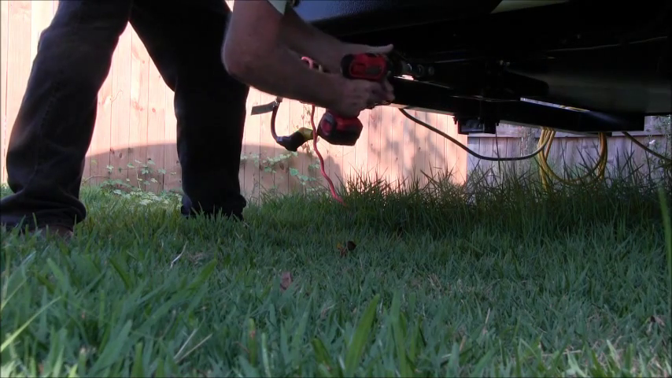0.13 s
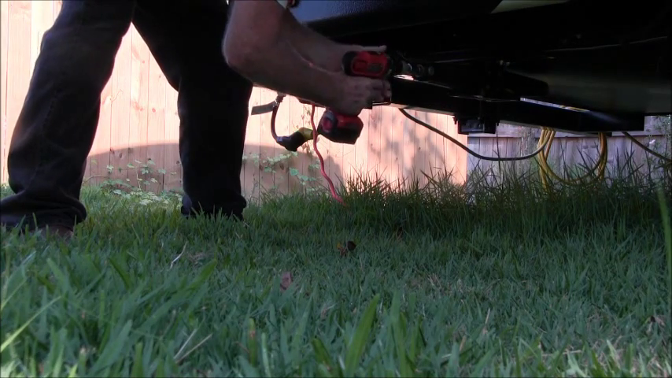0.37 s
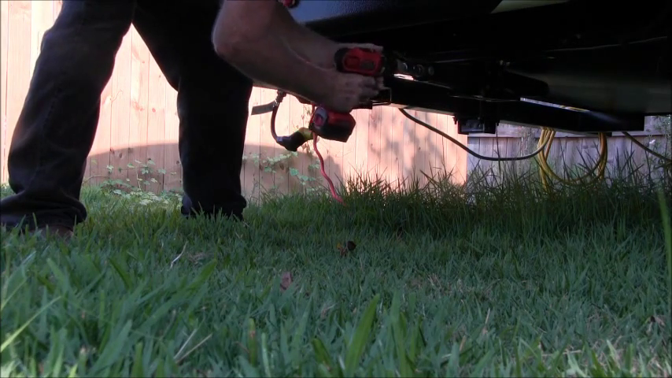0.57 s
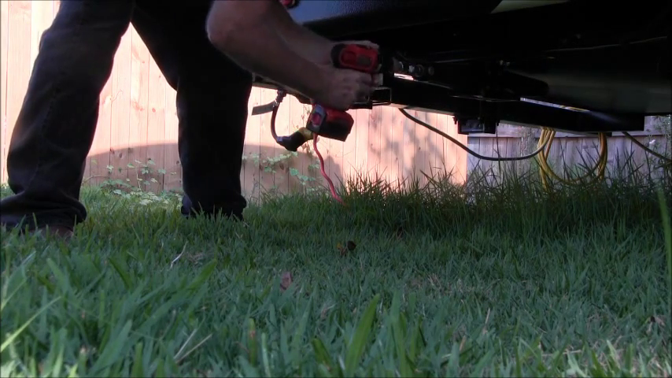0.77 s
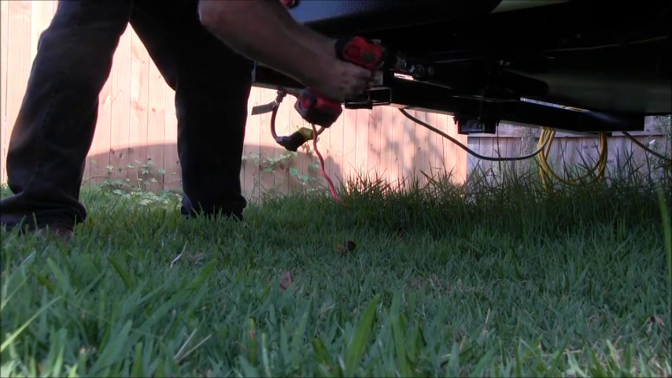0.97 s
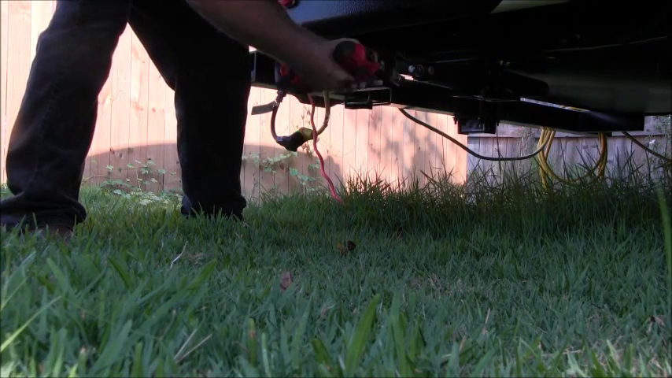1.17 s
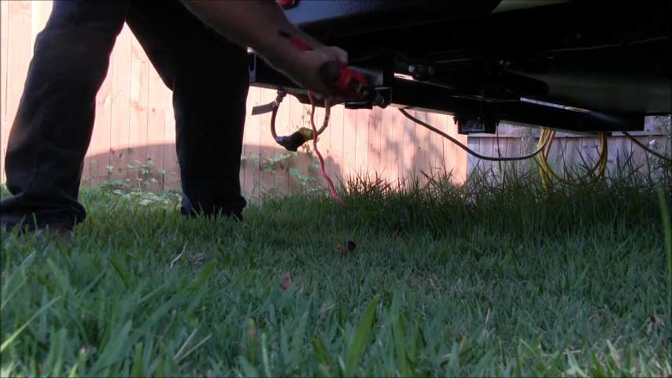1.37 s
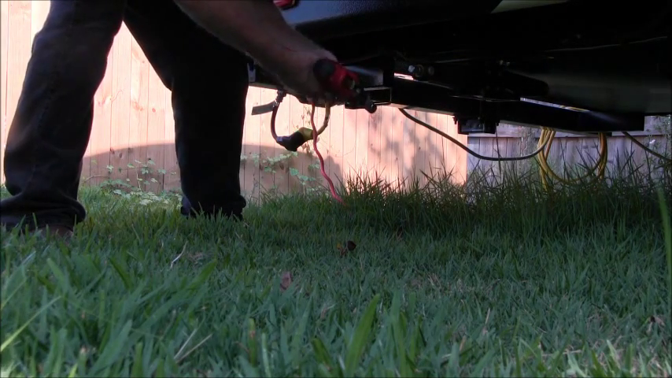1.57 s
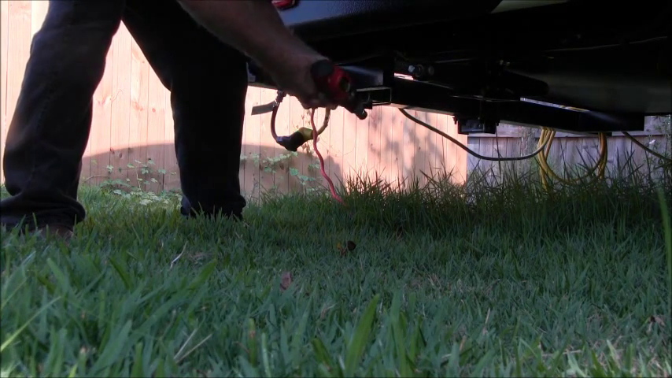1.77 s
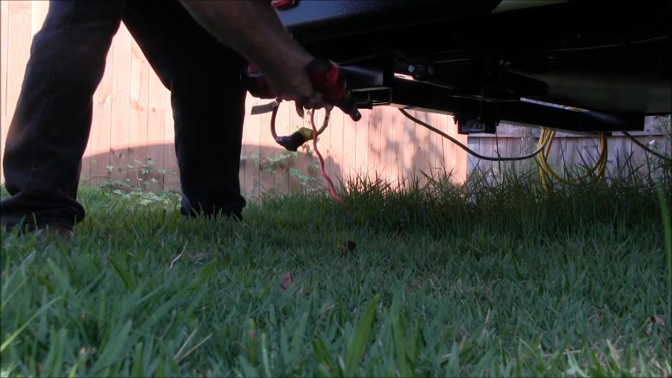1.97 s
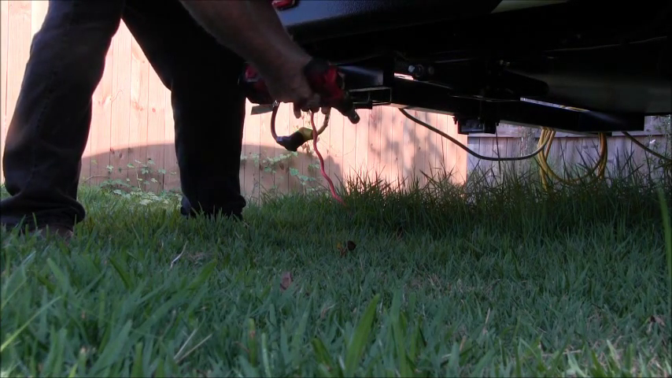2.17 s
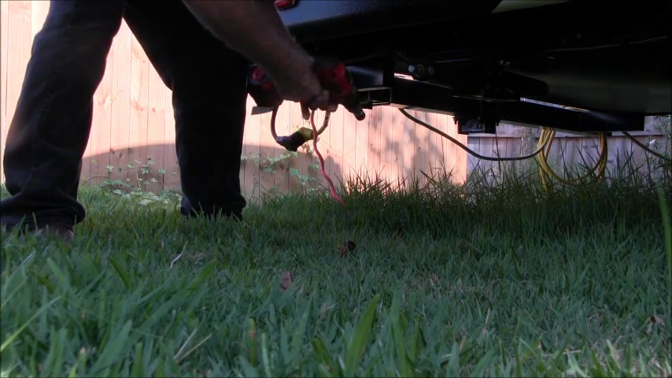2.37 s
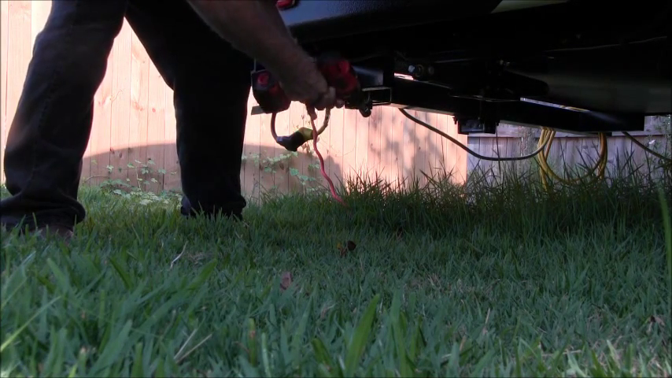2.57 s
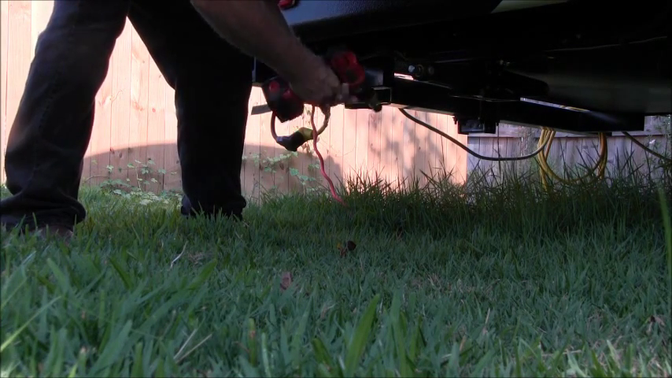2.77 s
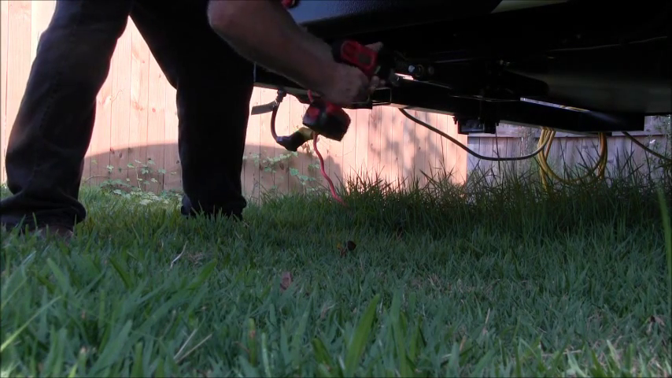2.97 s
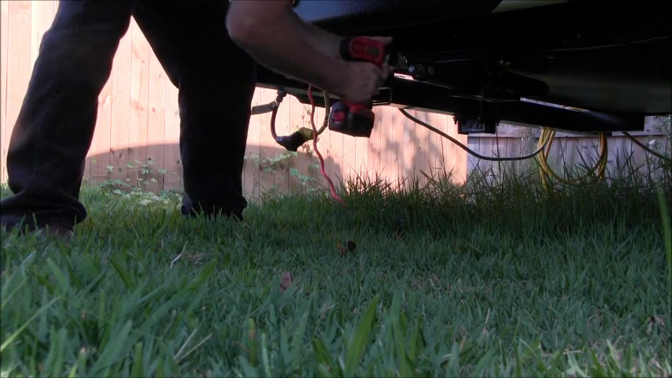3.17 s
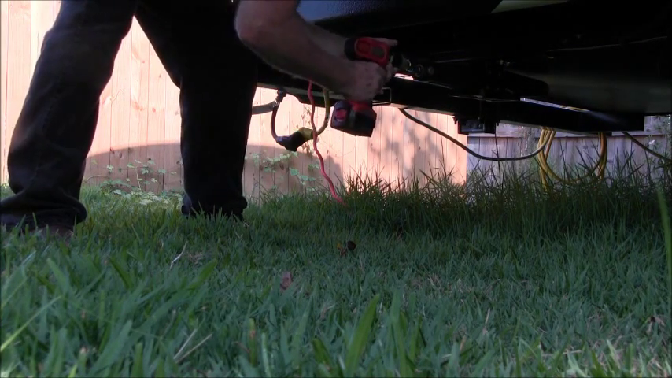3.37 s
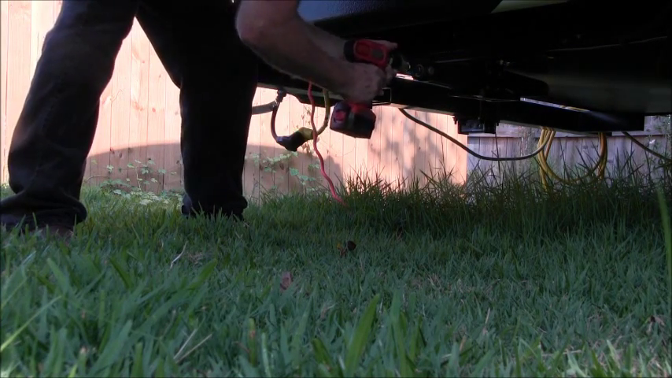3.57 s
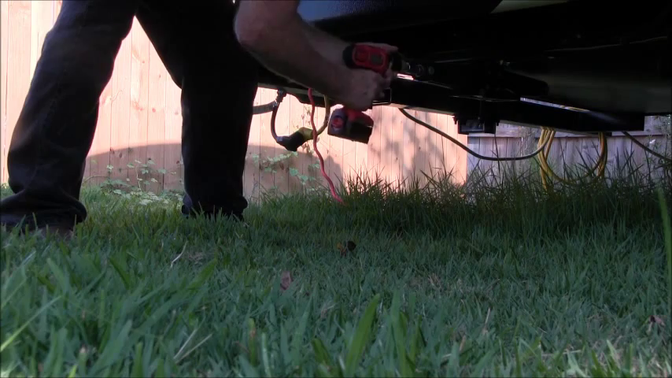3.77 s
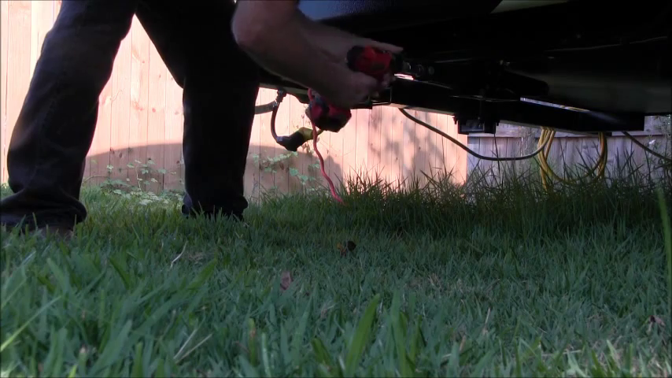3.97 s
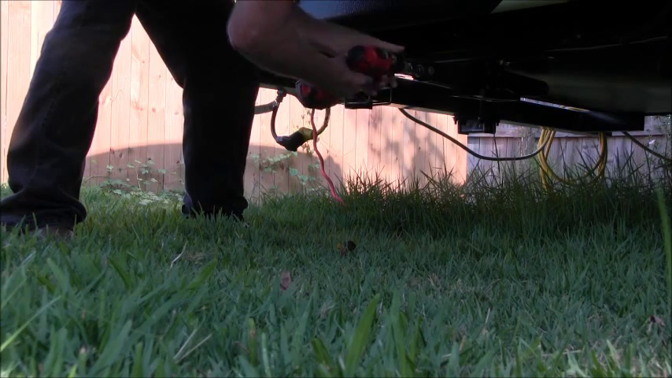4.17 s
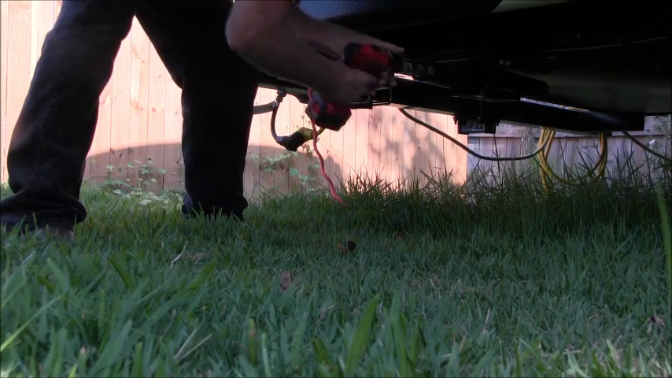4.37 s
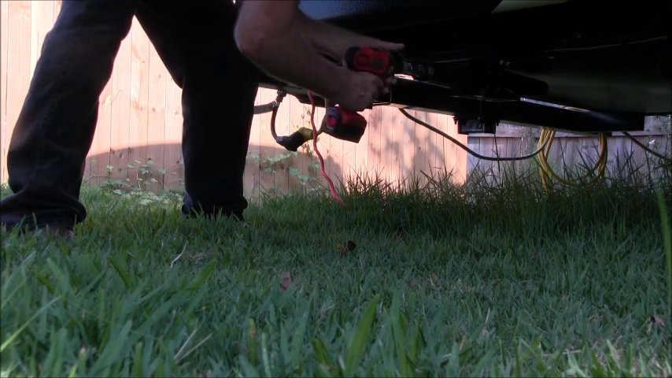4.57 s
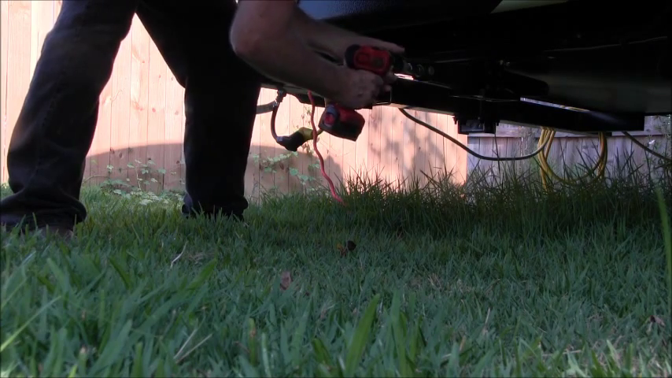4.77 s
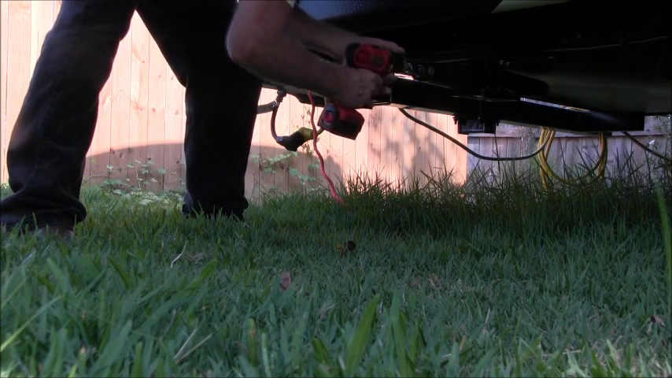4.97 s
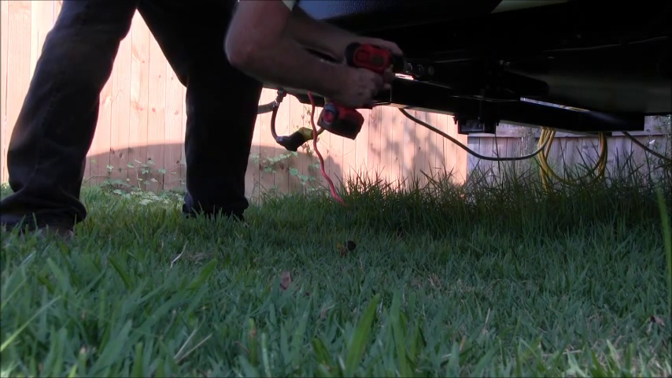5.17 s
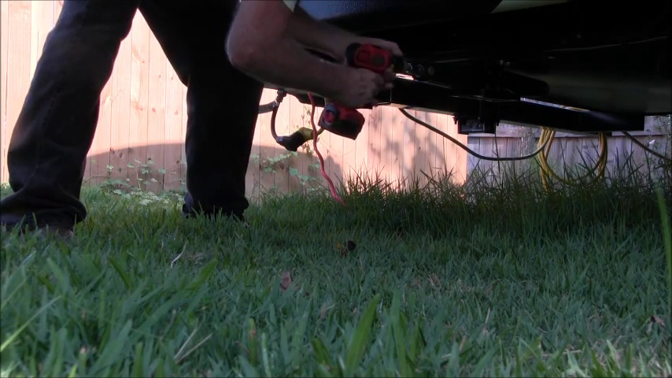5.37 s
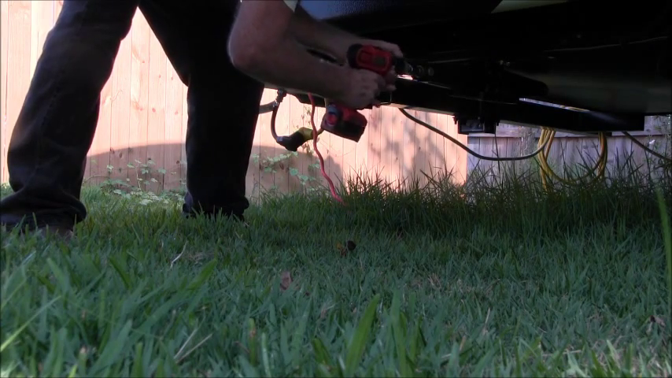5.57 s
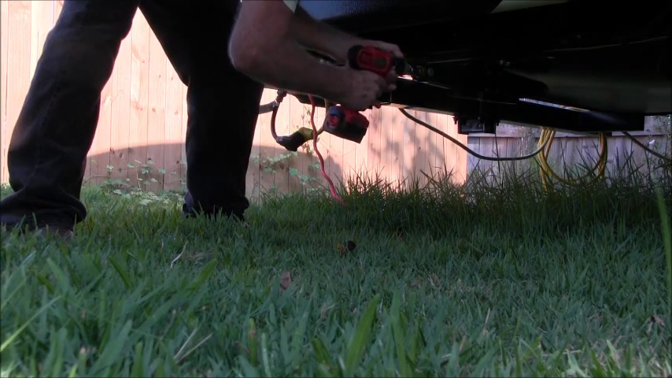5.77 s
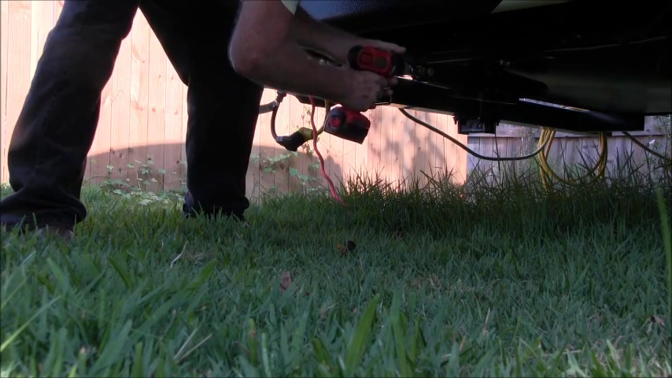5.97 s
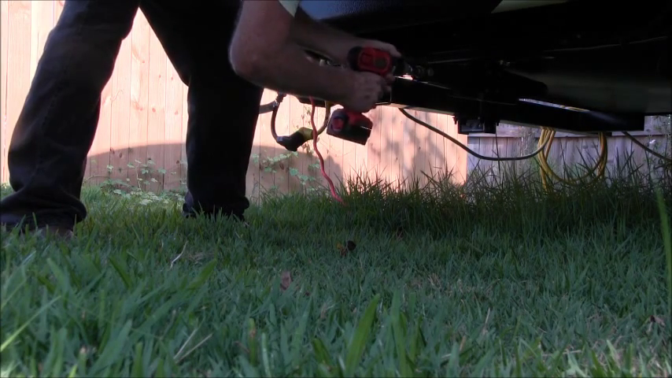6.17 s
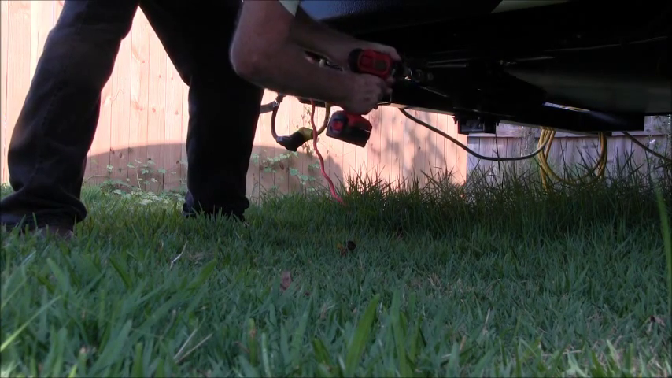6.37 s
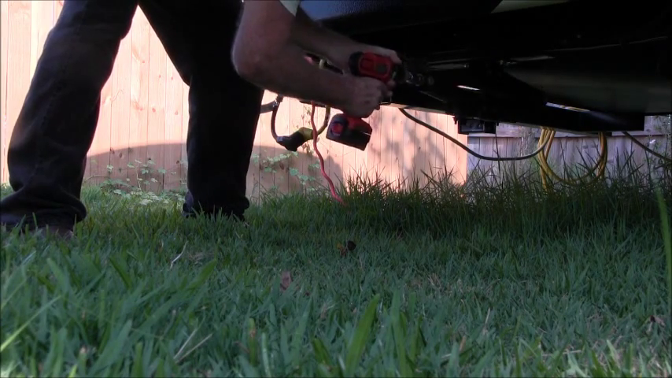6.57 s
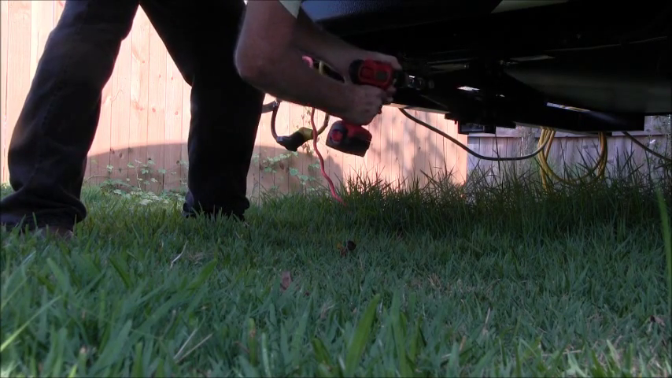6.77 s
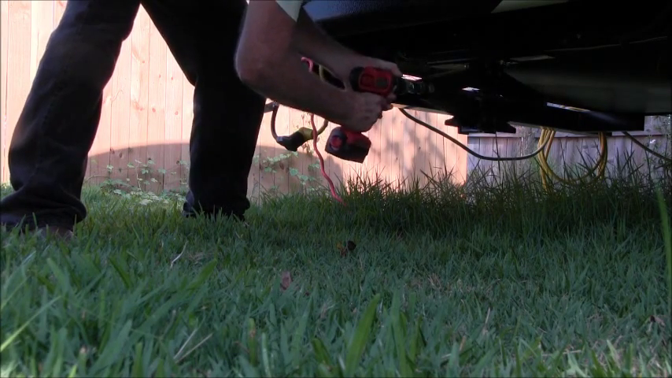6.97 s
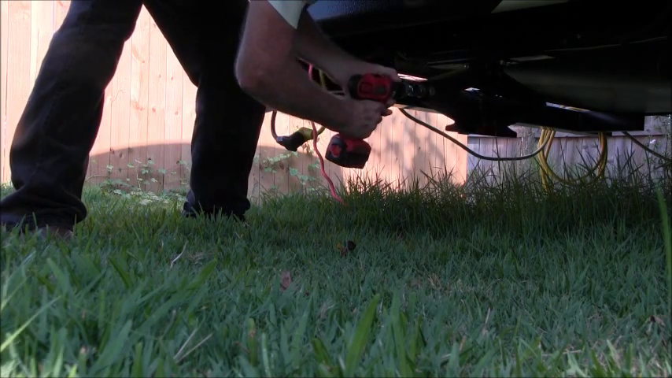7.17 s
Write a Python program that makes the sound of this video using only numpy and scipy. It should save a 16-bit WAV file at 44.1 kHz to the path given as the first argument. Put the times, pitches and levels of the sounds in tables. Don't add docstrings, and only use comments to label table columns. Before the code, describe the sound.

A small microphone in the grass, a few metres from a trailer, hears isolated switch snaps with quick fence echoes, then hard metallic knocks, dull thumps and low dragging groans. Finally a cordless drill gives one short try, then spins up high and holds, gears rattling and socket slapping the screw in quick alternation. Soft traffic, hiss, insect and birds stay behind.

```python
import sys
import numpy as np
from scipy import signal
from scipy.fft import rfft, irfft
from scipy.io import wavfile
from scipy.ndimage import uniform_filter1d

SR = 44100
rng = np.random.default_rng(int(sys.argv[2]) if len(sys.argv) > 2 else 0)


def field_ratio(decibels):
    return 10 ** (np.asarray(decibels, dtype=float) / 20)


def generate_wav(sig):
    pcm = np.round(np.clip(np.atleast_2d(sig).T, -1, 1) * 32767).astype(np.int16)
    wavfile.write(sys.argv[1], SR, pcm)


N = 318397
T = np.arange(N) / SR
LEFT_RIGHT = np.array([[1], [-1]])

# (squeeze [s], release [s], gear rattle [dB], whine [dB])
PULLS = [
    (5.517, 5.705, -35, -35.5),
    (6.269, 7.3, -31, -34.5),
]
# (time [s], frequency [Hz])
MESH_PITCH = [(5.5, 2000), (5.58, 2850), (5.66, 3540), (5.7, 3600), (5.8, 3000), (6.25, 2000), (6.34, 2900),
              (6.4, 3560), (6.45, 3990), (6.56, 4150), (6.8, 4210), (7.22, 4225)]
# (multiple of motor turns, level [dB])
MOTOR_ORDERS = [(12, 0), (10, -16), (15, -11), (24, -20), (40, -27)]
# (frequency [Hz], density [dB])
RATTLE_SPECTRUM = [(400, -8), (750, -9.5), (870, 3), (1100, -6), (1800, 0.5), (2900, 6), (3600, 6.5),
                   (4600, 1), (6000, -1.5), (10000, -6.5), (12500, -12.5), (15500, -7.5), (17000, -48)]
# (first time [s], peak [dB], boom over it [dB], centre [Hz], contact [ms])
TURN_SLAPS = [
    (6.444, -12.5, 0.5, 1850, 2.2),
    (6.53, -18, 1, 2700, 3.6),
]
# (time [s], peak [dB], boom over it [dB], centre [Hz])
JOLTS = [(5.556, -19.5, -9, 2700), (5.584, -19.5, 4.5, 670), (5.606, -16.5, -2, 3200),
         (5.666, -10, -5.5, 2380), (5.7, -18.5, -23, 2030), (5.713, -20, -4, 670), (6.298, -20, -7, 1500),
         (6.342, -10, -6, 2740), (6.521, -33, 2, 2900), (6.789, -22, 4, 1790), (7.015, -17, 0.5, 3000),
         (7.046, -14, -12, 2950)]
# (frequency [Hz], level [dB], t60 [s])
SCREW_MODES = [(680, -6, .15), (815, -8, .12), (865, -6, .15), (935, -4, .1), (1400, -8, .1),
               (1770, -2.5, .08), (2130, -8, .07), (2260, -5, .1), (2810, -5, .09), (2960, -2, .09),
               (3500, -8, .09), (8530, -20, .05), (9950, -20, .04), (14000, -24, .03)]
# (frequency [Hz], level [dB], t60 [s])
JACK_MODES = [(680, -4, .22), (1141, -6, .13), (1420, -7, .13), (1803, -4, .22), (1906, -11, .33),
              (1992, -12, .16), (2046, -10.5, .33), (2234, -6.5, .34), (2433, -3, .09), (2600, -2, .1),
              (2690, -2, .11), (2751, -5, .17), (2900, -5, .14), (3085, -8, .13), (3400, -10, .13)]
# (frequency [Hz], level [dB], t60 [s])
FLOOR_MODES = [(158.8, -2, 0.29), (185, 0, 0.17), (255.5, -4.5, 0.19), (303, -14, 0.134),
               (364.6, -13, 0.22), (667.5, -11.5, 0.36)]
# (time [s], peak [dB], boom over it [dB], top over it [dB], centre [Hz])
DRAGS = [
    (.645, -43.5, 8.5, -5, 700),
    (.663, -38.5, 6, -15, 2600),
    (.685, -32.5, 2, -8, 810),
    (3.586, -15, -14.5, -18, 2870),
    (3.692, -20.5, -12, -21, 2650),
    (3.72, -30, 0, -19, 1440),
    (4.309, -26, -27, -2, 1870),
]
# (time [s], peak [dB], boom over it [dB], top over it [dB], centre [Hz])
TAPS = [
    (3.589, -24, -25, -20, 2260),
    (3.683, -29.5, -22, -10, 2600),
    (4.002, -39.5, 4, -3, 2620),
    (4.147, -37.5, 5, -16, 2600),
    (4.161, -39, 11.5, -18, 1190),
    (4.281, -32.5, 6.5, -11, 2620),
    (4.321, -12.5, -3.5, 1.5, 1600),
    (4.506, -37, -4, -5, 1940),
]
# (time [s], boom [dB])
THUMPS = [
    (3.867, -39),
    (4.23, -31.5),
    (4.38, -32),
    (4.599, -40.5),
]
# (time [s], peak [dB], low edge [Hz], high edge [Hz], fence echo [dB])
CLICKS = [
    (1.465, -39, 1500, 9200, -1.5),
    (1.7555, -28.5, 1520, 3600, -1),
    (2.0653, -7, 1400, 6900, -6.5),
    (2.2154, -26, 1110, 7700, 0.5),
    (2.243, -42.5, 700, 3200, 4),
    (2.9712, -34.5, 1510, 4100, -4),
    (5.34, -51, 3000, 9000, -1),
    (5.412, -39.5, 3560, 9250, -15),
    (5.525, -41, 1990, 5600, -5),
    (6.264, -45, 2000, 8000, -3),
]
# (time [s], level [dB])
HANDLING = [
    (3.0, -73),
    (3.25, -55.5),
    (3.75, -46),
    (4.2, -48.5),
    (4.34, -36),
    (4.45, -46),
    (4.66, -47.5),
    (4.74, -60),
]
# (start [s], end [s], pitch [Hz], roughness [Hz], level [dB])
CREAKS = [
    (0.477, .9, 1400, 900, -60),
    (1.578, 1.76, 1167, 250, -66),
    (4.66, 4.95, 4180, 1500, -71),
    (3.362, 3.613, 1460, 352, -62),
    (3.78, 3.997, 4300, 1800, -61.5),
    (5.92, 6.302, 1670, 150, -66.5),
]
# (start [s], end [s], first pitch [Hz], last pitch [Hz], level [dB])
CHIRPS = [
    (0, 0.06, 4000, 3200, -59.5),
    (0.42, 0.55, 4950, 3950, -63),
    (2.64, 2.722, 6700, 7200, -76),
    (2.8, 2.877, 7100, 7000, -70),
]
# (start [s], end [s], first pitch [Hz], last pitch [Hz], level [dB])
TRILL = [
    (2.03, 2.061, 6800, 7740, -54),
    (2.07, 2.157, 7300, 7940, -55),
    (2.15, 2.228, 7950, 7700, -60.5),
]
# (frequency [Hz], density [dB])
TRAFFIC_SPECTRUM = [(12, -51), (20, -2), (112, 1), (195, -6.5), (243, -11), (328, -16), (422, -22.5),
                    (650, -30.5), (700, -21), (910, -59), (1540, -120)]
# (frequency [Hz], density [dB])
AIR_SPECTRUM = [(290, 7), (500, 2.5), (960, -1.5), (1190, -0.5), (7750, -10.5), (9490, -10), (10400, -14),
                (14200, -16.5), (16000, -25)]
# (time [s], step [dB])
DUCKS = [
    (2.09, -6),
    (4.36, -6),
]

SCREW_TURN_S, FASTEST_S = 0.165, 6.68
SPIN_UP_DB, SPIN_UP_S, COAST_DB_PER_S = 34, 0.036, 420
WHINE_DB_PER_KHZ, SINGS_FROM_HZ = -2, 2970
UNLOAD_DB = 9
FAN_DB, RUMBLE_DB, RUMBLE_COAST_SHARE = 0.27, -0.5, 0.39
SHAKE_DB, SHAKE_S = 4, 0.028
FLOOR_SHAKE_DB, FLOOR_SHAKE_S = 0.5, 0.043
SLAP_SCATTER_DB, SLAP_TOP_DB = 1.7, -13
JOLT_MS, DRAG_MS, TAP_MS = 5.8, 9, 3.9
THUMP_STEEL_DB, THUMP_HZ = -25, 1400
CLICK_TOP_DB, CLICK_DULL_DB_PER_OCT = -8.5, 22
FENCE_S, YARD_T60_S = 0.0083, 0.12
CHIRP_ROUGH_HZ, TRILL_ROUGH_HZ = 328, 1100
DUCK_S, RECOVER_DB_PER_S = 0.11, 1.77
TRAFFIC_DB, TRAFFIC_FADE_DB, TRAFFIC_FADE_S = -43, 3.5, 1.7
AIR_DB, INSECT_DB, INSECT_DB_PER_S = -55.5, -74.5, 1.24
HANDLING_RUSTLE_DB = -14


def unit(x):
    return x / np.sqrt(np.mean(x ** 2) + 1e-18)


def peak(x, db):
    return x * field_ratio(db) / np.abs(x).max()


def noise():
    return rng.standard_normal(N)


def colour(x, points):
    hz, db = np.transpose(points)
    f = np.arange(len(x) // 2 + 1) * SR / len(x) + 1
    gain = field_ratio(np.interp(np.log(f), np.log(hz), db))
    return unit(irfft(rfft(x) * gain, len(x)))


def band(x, lo_hz, hi_hz):
    edges = [lo_hz, min(hi_hz, 0.45 * SR)]
    return signal.sosfilt(signal.butter(2, edges, "band", fs=SR, output="sos"), x)


def walk(rate):
    k = max(int(SR / rate), 2)
    held = np.repeat(rng.standard_normal(N // k + 1), k)
    return 1.523 * uniform_filter1d(uniform_filter1d(held, k), k)[:N]


def ring(x, modes, shorten=1.0):
    out = 0
    for hz, db, t60 in modes:
        r = np.exp(-np.log(1000) / (t60 * shorten * SR))
        w = 2 * np.pi * hz / SR
        out = out + field_ratio(db) * signal.lfilter([np.sin(w)], [1, -2 * r * np.cos(w), r * r], x)
    return out


def add(out, x, s):
    i = int(s * SR)
    out[i:i + len(x)] += x[:N - i]


def effort_db(coast=1.0, axis=0):
    db = np.full(N, -140.0)
    for start, stop, *hold_db in PULLS:
        spin_up = SPIN_UP_DB * np.exp(-np.abs(T - start) / SPIN_UP_S)
        coast_down = coast * COAST_DB_PER_S * np.clip(T - stop, 0, 9)
        run = hold_db[axis] - spin_up - coast_down
        db = np.maximum(db, np.where(T > start, run, db))
    return db


def motor_whine():
    hz = np.interp(T, *np.transpose(MESH_PITCH))
    db = effort_db(2.9, axis=1) - WHINE_DB_PER_KHZ * (hz.max() - hz) / 1000
    db = db - np.clip(SINGS_FROM_HZ - hz, 0, 999) / 25
    unload = np.cos((T - TURN_SLAPS[0][0] - 0.03) * np.pi / SCREW_TURN_S) ** 8
    db = db - UNLOAD_DB * unload * (T > 6.55)
    screw = 2 * np.pi * (T - FASTEST_S) / SCREW_TURN_S
    ease = (0.8 * np.cos(screw + 0.46) + 0.3 * np.cos(2 * screw - 1.1)) * (T > 6.45)
    turns = np.cumsum(hz * (1 + 0.017 * ease + 0.003 * walk(70))) / (12 * SR)
    partials = []
    for order, order_db in MOTOR_ORDERS:
        tone = np.sqrt(2) * np.sin(2 * np.pi * order * turns)
        partials.append(field_ratio(order_db + 1.3 * walk(60)) * tone)
    mesh, *others = partials
    flicker = field_ratio(1.5 * walk(20) + 4 - 14 * np.clip(T - 6.7, 0, 1))
    up = np.clip((hz - 3740) / 250, 0.1, 1) * flicker
    return field_ratio(db - 3 * ease) * (mesh + up * sum(others))


def shake_after(blows, fade_s, boom_share):
    shake = 0
    for s, db, boom_db, *_ in blows:
        fade = (T > s) * np.exp(-np.abs(T - s) / fade_s)
        shake = shake + field_ratio(db + boom_share * boom_db + 13) * fade
    return shake


def gear_rattle(blows):
    teeth = noise() * field_ratio(0.5 * walk(500) + walk(100))
    rattle = colour(teeth, RATTLE_SPECTRUM)
    case = unit(band(rattle, 450, 5500)) + field_ratio(-12) * unit(ring(teeth, SCREW_MODES, 0.7))
    fan = unit(band(rattle, 3590, 11970))
    floor = unit(ring(teeth, FLOOR_MODES, 0.36)) + 0.8 * unit(band(teeth, 215, 324))
    rumble = unit(band(floor, 50, 670))
    shake = shake_after(blows, SHAKE_S, 0)
    shaken = field_ratio(2.5 + SHAKE_DB * shake) * case + field_ratio(FAN_DB + 2.4 * shake) * fan
    rumble_db = effort_db(RUMBLE_COAST_SHARE) + RUMBLE_DB - 2
    rumble_db = rumble_db + FLOOR_SHAKE_DB * shake_after(blows, FLOOR_SHAKE_S, 1)
    return field_ratio(effort_db()) * shaken + field_ratio(rumble_db) * rumble


def socket_blows():
    rows = [(s, db, boom_db + 3.5, SLAP_TOP_DB, hz, JOLT_MS) for s, db, boom_db, hz in JOLTS]
    for first, db, boom_db, hz, ms in TURN_SLAPS:
        for s in np.arange(first, T[-1], SCREW_TURN_S):
            slap_db = db + SLAP_SCATTER_DB * rng.standard_normal()
            rows.append((s, slap_db, boom_db, SLAP_TOP_DB, hz, ms))
    return rows


def frame_blows():
    thumps = [(s, db + THUMP_STEEL_DB, -THUMP_STEEL_DB, -13, THUMP_HZ) for s, db in THUMPS]
    return [(*row, DRAG_MS) for row in DRAGS] + [(*row, TAP_MS) for row in TAPS + thumps]


def knocks(blows, body, crack_db, loose_db):
    out, t = np.zeros(N), T[:SR // 2]
    for s, db, boom_db, top_db, hz, ms in blows:
        u = t * 1000 / ms
        grit = rng.standard_normal(len(t)) * (1 - np.exp(-3 * u))
        push = grit * np.exp(-u)
        strike = 1.5 * (t == t[30]) + push / np.linalg.norm(push)
        modes = np.array(body)
        modes[:, 1] -= 8 * np.abs(np.log2(modes[:, 0] / hz))
        steel = peak(ring(strike, modes), db)
        crack = peak(band(push, 0.5 * hz, 1.66 * hz), db + crack_db)
        shake = band(grit * np.exp(-t / 0.029), 0.48 * hz, 1.3 * hz)
        loose = peak(band(shake, 170, 7800), db + loose_db)
        heave = u * np.exp(-2 * u) + 0.28 * grit * np.exp(-t / 0.018)
        boom = peak(band(ring(heave, FLOOR_MODES, 0.55), 164, 880), db + boom_db)
        top = peak(band(grit * np.exp(-0.8 * u), 3900, 6300), db + top_db)
        add(out, steel + crack + loose + boom + top, s)
    return out


def switch_clicks():
    out, t = np.zeros(N), T[:SR // 10]
    for s, db, lo_hz, hi_hz, echo_db in CLICKS:
        top_db = CLICK_TOP_DB - CLICK_DULL_DB_PER_OCT * np.log2(9000 / hi_hz)
        direct, echo = (0.0006, 0.1, 0.0031, 1.0), (FENCE_S, echo_db, 0.0045, 0.6)
        for lag, path_db, fade, dull in (direct, echo):
            burst = np.tanh(t / 0.00018) * np.exp(-(t / fade) ** 3)
            snap = rng.standard_normal(len(t)) * (burst + 0.5 * np.exp(-t / 0.0086))
            body = band(band(snap, dull * lo_hz, hi_hz), 0.7 * dull * lo_hz, 1.2 * hi_hz)
            top = band(snap, hi_hz, 13500)
            add(out, peak(body, db + path_db) + peak(top, db + path_db + top_db), s + lag)
    return out


def yard_scatter(tool):
    t = T[:SR // 3]
    fade = field_ratio(-60 * t / YARD_T60_S) * np.clip(t / 0.0036, 0, 1)
    mid, side = rng.standard_normal((2, len(t))) * fade
    tails = mid + field_ratio(-3.0) * side * LEFT_RIGHT
    return signal.fftconvolve(band(tool, 200, 19000)[None], tails, axes=1)[:, :N]


def birds_and_creaks():
    out = np.zeros(N)
    rows = [(*row[:4], CHIRP_ROUGH_HZ, row[4]) for row in CHIRPS]
    rows += [(*row[:4], TRILL_ROUGH_HZ, row[4]) for row in TRILL]
    rows += [(t0, t1, hz, hz, rough_hz, db) for t0, t1, hz, rough_hz, db in CREAKS]
    for t0, t1, first_hz, last_hz, rough_hz, db in rows:
        u = np.clip((T - t0) / (t1 - t0), 0, 1)
        phase = 2 * np.pi * np.cumsum(first_hz + (last_hz - first_hz) * u) / SR
        tone = walk(rough_hz) * np.sin(phase) + walk(rough_hz) * np.cos(phase)
        out += field_ratio(db) * np.sin(np.pi * u) ** 0.27 * tone
    return out


def frame_groan():
    handling = field_ratio(np.interp(T, *np.transpose(HANDLING), left=-120, right=-120))
    groan = field_ratio(-3.0) * unit(band(band(noise(), 60, 234), 60, 344))
    rustle = field_ratio(HANDLING_RUSTLE_DB) * unit(band(noise(), 550, 2340))
    return handling * field_ratio(0.92 * walk(21.91)) * (groan + rustle)


def wide(make, side_db):
    return make() + field_ratio(side_db) * make() * LEFT_RIGHT


def background():
    traffic = wide(lambda: field_ratio(1.2 * walk(6)) * colour(noise(), TRAFFIC_SPECTRUM), -15)
    air = wide(lambda: field_ratio(0.5 * walk(5.3)) * colour(noise(), AIR_SPECTRUM), -4.0)
    throb = 1 + 0.27 * np.cos(2 * np.pi * np.cumsum(68 + 1.58 * walk(1)) / SR)
    insect = throb * wide(lambda: unit(band(noise(), 9400, 9800)), -9)
    traffic_db = TRAFFIC_DB - TRAFFIC_FADE_DB * np.clip(T / TRAFFIC_FADE_S, 0, 1)
    insect_db = INSECT_DB + INSECT_DB_PER_S * T
    far = field_ratio(traffic_db - 2.5) * traffic + field_ratio(AIR_DB + 2) * air + field_ratio(insect_db + 5.5) * insect
    gain_db = RECOVER_DB_PER_S * np.clip(T - DUCKS[0][0], 0, 9)
    for s, step_db in DUCKS:
        gain_db = gain_db + step_db * np.clip((T - s) / DUCK_S, 0, 1)
    return field_ratio(gain_db) * far


def scene():
    blows = socket_blows()
    tool = motor_whine() + gear_rattle(blows) + field_ratio(-11) * knocks(blows, SCREW_MODES, 1, -4)
    tool = tool + knocks(frame_blows(), JACK_MODES, -8.5, -10) + switch_clicks()
    side = 0.094 * band(tool, 40, 330) - 0.1 * band(tool, 250, 18000)
    side = side + 0.019 * (np.roll(tool, 3) - tool) + 0.12 * np.roll(band(tool, 90, 900), 150)
    near = tool + side * LEFT_RIGHT + field_ratio(-35.5) * yard_scatter(tool)
    return near + birds_and_creaks() + frame_groan() + background()


def top_cut(x):
    return signal.sosfilt(signal.butter(12, 16430, fs=SR, output="sos"), x)


def record(dry):
    thin = signal.sosfilt(signal.butter(2, 70, "high", fs=SR, output="sos"), dry)
    return top_cut(thin)


dry = scene()
out = record(dry)
generate_wav(out)
```